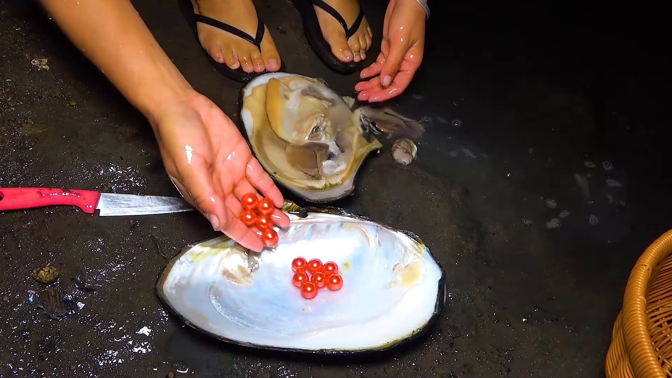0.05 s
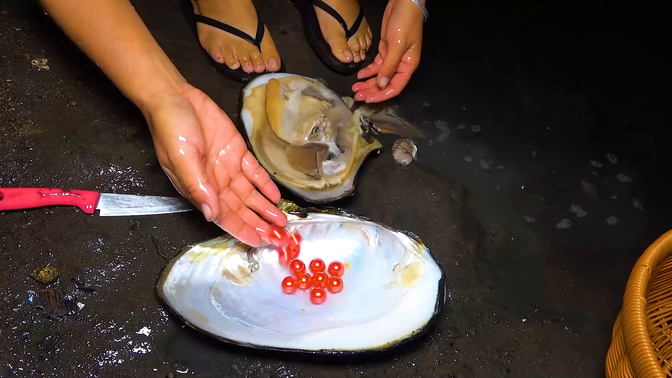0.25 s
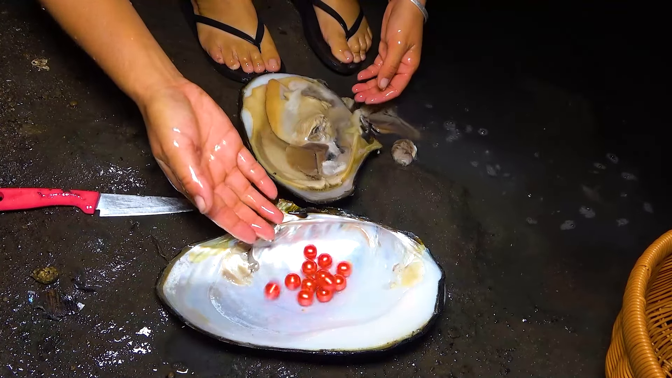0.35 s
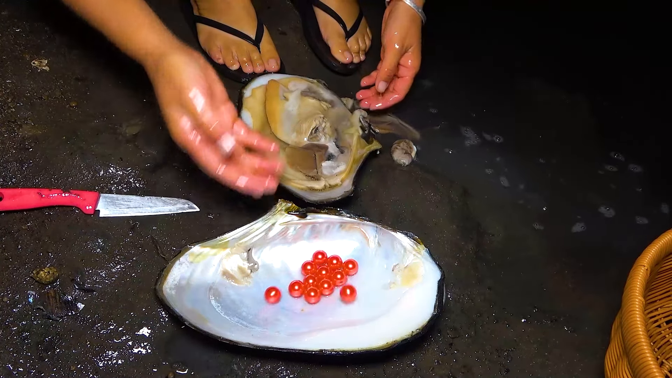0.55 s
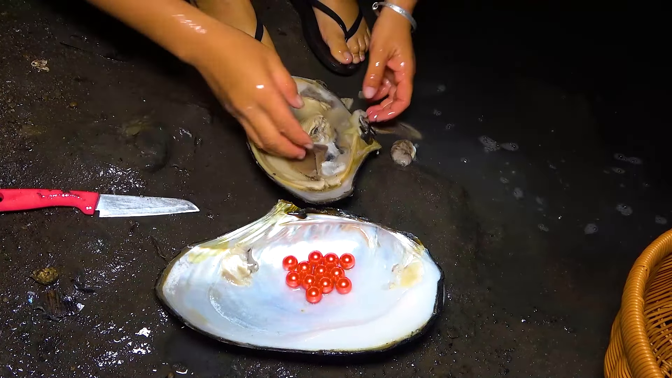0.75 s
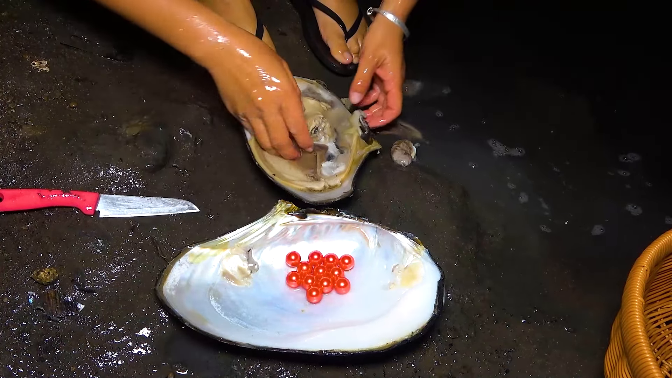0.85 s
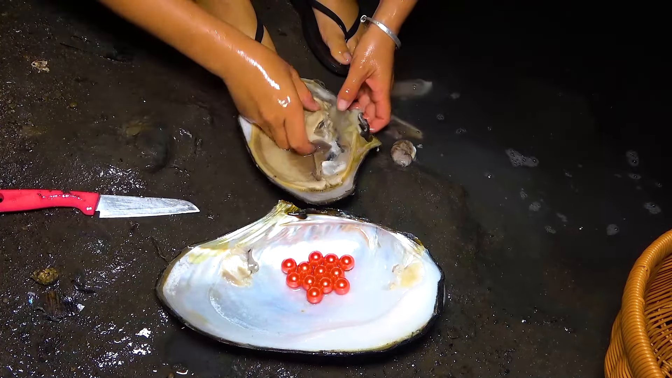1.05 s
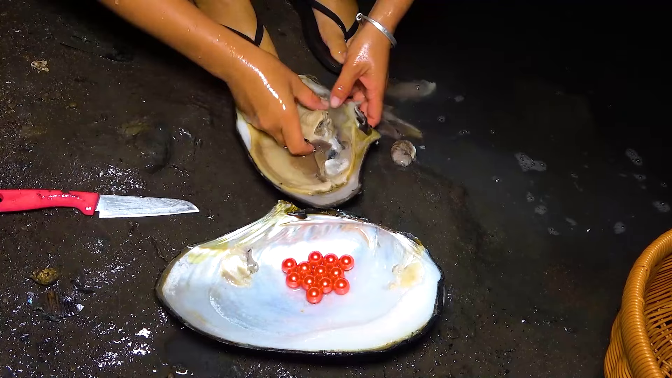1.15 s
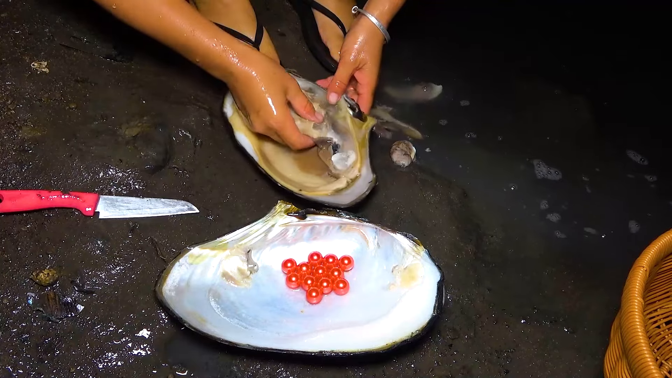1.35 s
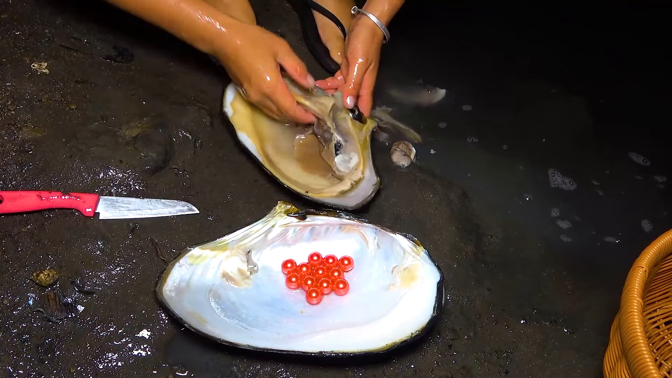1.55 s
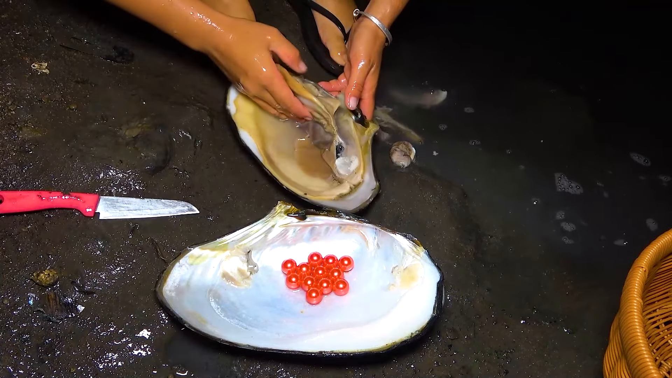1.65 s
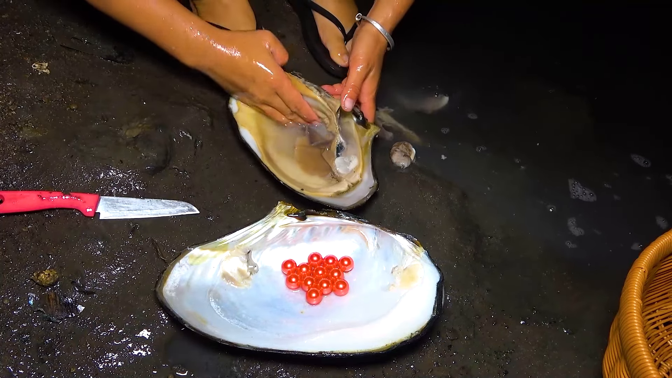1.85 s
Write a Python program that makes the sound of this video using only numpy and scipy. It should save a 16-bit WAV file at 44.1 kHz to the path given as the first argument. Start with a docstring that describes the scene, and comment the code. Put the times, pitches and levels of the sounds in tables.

```python
"""On wet ground between hard walls, close to an open shell, a handful of pearls is tipped in.
Each pearl is a crack, decaying sines for the shell's modes and a noisy rattle; tiny sines jostle among them.
A low thump lies under some clicks. Damped tones mixed with noise make wet ticks and a drip before and after,
over a trickle of filtered noise. The walls answer with a bright tail of about a second, made of noise
whose frequencies die at their own speeds. The camera's limiter ducks just ahead of the loudest clicks."""
import sys
import numpy as np
from scipy import signal
from scipy.fft import rfft, irfft, next_fast_len
from scipy.io import wavfile
from scipy.ndimage import uniform_filter1d, minimum_filter1d, map_coordinates

SR = 44100
rng = np.random.default_rng(int(sys.argv[2]) if len(sys.argv) > 2 else 0)


def generate_wav(sig):
    """Save sig (samples, or channels by samples) to the path in sys.argv[1] as 16-bit PCM at SR."""
    pcm = np.round(np.clip(np.atleast_2d(sig).T, -1, 1) * 32767).astype(np.int16)
    wavfile.write(sys.argv[1], SR, pcm)


N = 83790  # samples, 1.9 s


def amp(db):
    """Decibels to an amplitude factor."""
    return 10 ** (np.asarray(db) / 20)


def unit(x):
    """Scale to an rms of 1."""
    return x / np.sqrt(np.mean(x ** 2) + 1e-20)


def along(points, hz):
    """Read (pitch, value) points on a log frequency axis."""
    f, v = np.transpose(points)
    return np.interp(np.log(hz + 1), np.log(f + 1), v)


def over_time(points):
    """Read (time, dB) points at every sample, as an amplitude."""
    return amp(np.interp(np.arange(N) / SR, *np.transpose(points)))


def filtered(x, response):
    """Multiply the spectrum of x by a response of frequency."""
    n = x.shape[-1]
    m = next_fast_len(n + 8192)
    return irfft(rfft(x, m) * response(np.fft.rfftfreq(m, 1 / SR)), m)[..., :n]


def band(x, kind, hz):
    """A causal third-order roll-off, "low" or "high" pass."""
    sos = signal.butter(3, min(hz, SR / 2.1), kind, fs=SR, output="sos")
    return signal.sosfilt(sos, x)


def coloured(points, count):
    """Noise of rms 1 with a (Hz, dB) spectrum."""
    return unit(filtered(rng.standard_normal(count), lambda hz: amp(along(points, hz))))


def wobble(rate):
    """A smooth random curve, rate knots a second."""
    return map_coordinates(rng.standard_normal(int(N * rate / SR) + 4), [np.arange(N) * rate / SR])


def add(track, s, sound):
    """Mix a sound in at time s."""
    part = track[round(s * SR):][:len(sound)]
    part += sound[:len(part)]


# Spectrum of the trickling water: pitch_hz, relative_level_db (per Hz)
WATER_SPECTRUM = [(15, -30), (25, -7), (175, -4), (270, -7.5), (531, -1.5), (962, 1.5), (1160, -0.5),
                  (1480, -10.5), (3080, -10.5), (4610, -17.5), (6210, -11.5), (16000, -21.5)]
# How strongly the water flows: time_s, level_db
WATER_FLOW = [(0, -65.5), (.22, -61.5), (1.1, -61.5), (1.45, -62.5), (1.65, -65), (1.9, -63.5)]
# How strongly the restless band sounds: time_s, level_db
GURGLE_FLOW = [(0, -71.5), (.09, -59.5), (.22, -107), (1.2, -77.5), (1.6, -87.5), (1.9, -85)]
# Stereo width of the water: pitch_hz, side_gain_db
WATER_WIDTH = [(60, -7.5), (500, -7), (1300, -11), (1900, -15), (4300, -28), (5500, -6), (15000, -7.5)]
GURGLE_HZ, GURGLE_WIDTH_HZ = 1130, 200  # centre and half-width


def trickle():
    """Water as faint patchy noise plus a narrow noise band that flickers quickly; mid and side."""
    patchy = coloured(WATER_SPECTRUM, N) * amp(wobble(6.7))
    bed = np.array([patchy, coloured(WATER_SPECTRUM, N)])
    gurgle_band = lambda f: 1 / (1 + ((f - GURGLE_HZ) / GURGLE_WIDTH_HZ) ** 4)
    gurgle = unit(filtered(rng.standard_normal((2, N)), gurgle_band))
    gurgle = gurgle * amp(2.5 * wobble(40))
    mid, side = over_time(WATER_FLOW) * bed + over_time(GURGLE_FLOW) * gurgle
    return mid, filtered(side, lambda hz: amp(along(WATER_WIDTH, hz)))


# Small wet ticks and drips, not in time order:
# start_s, level_db (before the attack and preamp), pitch_hz, t60_s, noisy_share (0-1)
WET_TICKS = [(.0095, -21.5, 5090, 0.0096, 0.69), (.068, -47.5, 2380, 0.042, 0.36),
             (.0795, -33, 1158, 0.041, 0.04), (.0835, -45, 9160, 0.019, 0.02),
             (.211, -36, 4900, 0.0067, 0.84), (.236, -32.5, 4110, .05, .4), (.242, -27, 3220, 0.018, .4),
             (1.0782, -20.5, 3634, 0.032, 0.59), (1.081, -40.5, 596, 0.045, 0.8),
             (1.081, -37, 970, 0.086, 0.78), (1.189, -37.5, 6095, 0.014, 0.77),
             (1.207, -40.5, 2836, 0.048, .25), (1.222, -40.5, 1110, 0.019, 0.3),
             (1.328, -42.5, 1310, 0.026, 0.33), (1.328, -41, 9300, .012, .95),
             (1.403, -49, 770, 0.014, 0.45), (1.565, -46, 3640, .015, 0.55),
             (1.663, -51.5, 2340, 0.027, 0.3), (1.664, -50, 3270, 0.023, .1), (1.684, -52, 7320, 0.012, .3),
             (1.701, -44.5, 3300, 0.024, 0.73), (1.824, -43, 3530, 0.041, 0.56),
             (1.829, -44.5, 4860, 0.018, 0.9), (1.830, -49, 907, 0.017, .8), (1.190, -40, 1500, .01, .9),
             (1.029, -47, 3290, 0.019, 0.6), (1.041, -43, 1185, 0.029, 0.3),
             (1.272, -51, 1022, 0.032, 0.37), (1.459, -46.5, 3496, 0.02, 0.6),
             (1.594, -51, 1100, 0.012, 0.64), (1.802, -50, 3340, .015, .4)]
TICK_ATTACK_S, TICK_OCTAVES = 0.00069, 1.04  # noisier ticks are wider


def ticks():
    """Each tick or drip is a damped tone mixed with noise around the same pitch."""
    out, t = np.zeros(N), np.arange(SR // 12) / SR
    for s, db, hz, t60, noisy in WET_TICKS:
        share = np.clip(noisy, 0, 1)
        octaves = TICK_OCTAVES * max(share, .2)
        around = lambda f: np.exp(-(np.log2((f + 1) / hz) / octaves) ** 2)
        hiss = unit(filtered(rng.standard_normal(len(t)), around))
        body = (1 - share) * np.sin(2 * np.pi * hz * t) + share * hiss / 2
        envelope = amp(db - 60 * t / t60) * (1 - np.exp(-t / TICK_ATTACK_S))
        add(out, s, envelope * body)
    return out


# How long the walls ring: pitch_hz, t60_s
WALL_DECAY = [(300, 0.2), (1000, 1.69), (2500, 1.36), (4500, 1.193), (8000, 0.94), (13000, 0.33)]
# Tone of the wall tail at its start: pitch_hz, relative_level_db
WALL_TONE = [(200, -38), (600, -0.5), (1200, 6.5), (4000, 6.5), (8000, 11), (15000, -2)]
WALLS_DB, WALL_DELAY_S, WALL_RISE_S = -11.5, .006, 0.004


def walls(x):
    """Hard walls as convolution with noise, each frequency dying at its own speed; mid and side."""
    hz, t, z = signal.stft(rng.standard_normal((2, 2 * SR)), SR, nperseg=256)
    decay_db = along(WALL_TONE, hz)[:, None] - 60 * t / along(WALL_DECAY, hz)[:, None]
    shape = amp(decay_db) * (1 - np.exp(-t / WALL_RISE_S))
    tail = signal.istft(z * shape, SR, nperseg=256)[1]
    tail = tail / np.linalg.norm(tail[0])
    late = np.pad(x, (round(WALL_DELAY_S * SR), 0))[None]
    return amp(WALLS_DB) * signal.fftconvolve(late, tail, axes=1)[:, :N]


# Pearls landing, levels before filters and preamp:
# start_s, level_db, struck_mode_hz, thump_db, crack_db, low_mode_lift_db
LANDINGS = [(0.2477, -2, 7030, -25, 1, 9), (0.3001, -7, 4310, -74, -38, 20),
            (0.3064, -14.5, 4240, -29, -11, 19), (0.3263, -11, 2720, -63, -21.5, 10),
            (0.35, -11, 4260, -58, -13, -34), (.3739, -7, 2810, -33, -8.5, 3),
            (0.395, -12.5, 4210, -66, -34, -8), (0.4001, -6, 4150, -21.5, -23, 7),
            (0.4169, -16, 4180, -62, -12.5, 16), (0.4202, -7, 4200, -15, -9.5, 10),
            (0.43, -13, 4060, -50, -12, 9), (.4561, -4, 4800, -42, -18, -6),
            (0.4646, -9.5, 4340, -54, -17, -15), (0.4785, -10, 4250, -45, -38, -10),
            (.5012, -7.5, 3880, -60, -23, -5), (0.512, -20, 4100, -66, -25, 2),
            (.5217, -10.5, 4255, -71, -27.5, -21), (0.5584, -8.5, 3970, -65, -32, -17),
            (0.575, -25, 4347, -62.5, -31, -7), (0.6259, -7, 3870, -52, -5, -14),
            (0.653, -38.5, 3630, -74, -29, -9), (0.7091, -9.5, 4030, -44.5, -15, -4),
            (0.7572, -17, 3890, -65, -45, 14), (.786, -24, 4430, -77, -37, 21),
            (0.8313, -24.5, 4310, -65, -30, -9)]
# Modes of the shell: pitch_hz, relative_level_db, t60_s
SHELL_MODES = [(1192, -13, 0.045), (1915, -3.5, 0.018), (2822, 6.5, 0.041), (3097, 3, 0.075),
               (3360, -37, 0.025), (3882, 12.5, 0.022), (4274, 13, 0.018), (4895, 5, 0.025),
               (4780, -20, 0.033), (6050, 4, 0.075), (6380, -27, .02), (7270, 15.5, 0.012),
               (8000, -31, .015), (10780, 4, .012)]
# Spectrum of the rattle: pitch_hz, relative_level_db
RATTLE_SPECTRUM = [(400, -68), (800, -27), (1200, -0.5), (1600, -17.5), (2300, -10), (2800, -3), (4300, 7),
                   (7400, -4), (10000, -13), (15500, -33.5)]
# Modes near the struck one are lifted; every mode level scatters; modes below LOW_MODES_HZ share one lift
FAVOUR_DB, FAVOUR_OCTAVES, SCATTER_DB, LOW_MODES_HZ = 12, .08, 4, 2200
DETUNE = .005  # share of pitch; random detuning of each mode at every hit
CRACK_S, CRACK_LOW_HZ = 0.0029, 2500  # t60, high-pass
RATTLE_S, RATTLE_DB, RATTLE_SEND_DB = 0.019, -11, 8.5  # t60, level by the ring, extra send to the walls
THUMP_S, THUMP_LOW_HZ = 0.00042, 85  # time to peak, high-pass
CLICK_LOW_HZ, CLICK_HIGH_HZ, AIR_HZ = 847, 9730, 11150  # one high-pass, two low-passes


def pearls():
    """Each impact cracks, rings the shell's modes and rattles; clicks, rattles for the walls, low thumps."""
    clicks, thumps, sent = np.zeros((3, N))
    t = np.arange(SR // 10) / SR
    hz, level, t60 = np.transpose(SHELL_MODES)
    for s, db, struck, thump_db, crack_db, low_db in LANDINGS:
        lift = FAVOUR_DB * np.exp(-(np.log2(hz / struck) / FAVOUR_OCTAVES) ** 2)
        lift += SCATTER_DB * rng.standard_normal(len(hz))
        lift += low_db * (hz < LOW_MODES_HZ)
        pitch = hz * (1 + DETUNE * rng.standard_normal(len(hz)))
        decay = amp((level + lift)[:, None] - 60 * t / t60[:, None])
        ring = (decay * np.sin(2 * np.pi * pitch[:, None] * t)).sum(0)
        ring = ring / np.abs(ring).max()
        rattle = amp(RATTLE_DB - 60 * t / RATTLE_S) * coloured(RATTLE_SPECTRUM, len(t))
        crack_noise = band(rng.standard_normal(len(t)), "high", CRACK_LOW_HZ)
        crack = amp(crack_db - 60 * t / CRACK_S) * crack_noise
        add(clicks, s, amp(db) * (ring + rattle) + crack)
        add(sent, s, amp(db + RATTLE_SEND_DB) * rattle)
        add(thumps, s, amp(thump_db) * np.e * t / THUMP_S * np.exp(-t / THUMP_S))
    clicks = band(clicks, "high", CLICK_LOW_HZ)
    clicks = band(band(clicks, "low", CLICK_HIGH_HZ), "low", AIR_HZ)
    thumps = filtered(thumps, lambda f: (1j * f / (THUMP_LOW_HZ + 1j * f)) ** 2)
    return clicks, sent, thumps


# Base level of pearls clicking together: time_s, level_db (before random lift and preamp)
JOSTLE_LEVEL = [(.26, -36), (.4, -24), (.6, -24), (.8, -30), (.95, -42)]
JOSTLES, JOSTLE_HZ, JOSTLE_OCTAVES = 110, 4400, .3  # count, middle pitch, pitch spread
JOSTLE_CYCLES, JOSTLE_SPREAD_DB, JOSTLE_ATTACK_S = 9, 4.5, .0002  # cycles to fall 60 dB, mean lift, attack


def jostle(count):
    """Pearls rolling against each other: tiny damped sines at random times, sizes and pitches."""
    out, t = np.zeros(N), np.arange(SR // 100) / SR
    s, db = np.transpose(JOSTLE_LEVEL)
    times = rng.uniform(s[0], s[-1], count)
    sizes = rng.exponential(size=count)
    pitches = rng.standard_normal(count)
    for when, size, pitch in zip(times, sizes, pitches):
        hz = min(JOSTLE_HZ * 2 ** (JOSTLE_OCTAVES * pitch), SR / 4)
        level = np.interp(when, s, db) + JOSTLE_SPREAD_DB * size
        envelope = amp(level - 60 * t * hz / JOSTLE_CYCLES) * (1 - np.exp(-t / JOSTLE_ATTACK_S))
        add(out, when, envelope * np.sin(2 * np.pi * hz * t))
    return out


# Stereo width of the clicks, ticks and wall tail: pitch_hz, side_gain_db
SHELL_WIDTH = [(60, -9.5), (400, -7), (1200, -20), (2200, -38.5), (3500, -24.5), (5500, -10.5),
               (8000, -7.5), (14000, -10.5)]
TICK_SEND_DB, RING_SEND_DB = 0, -3  # what reaches the walls
LEFT_DB, RIGHT_DB = 0.27, 0.66  # the shell leans left, the trickle right


def scene():
    """Pearls, jostling, ticks and their wall tail lean left; the trickle leans right."""
    clicks, rattles, thumps = pearls()
    clicks = clicks + jostle(count=JOSTLES)
    small = ticks()
    near = clicks + small
    wet = walls(amp(RING_SEND_DB) * clicks + rattles + amp(TICK_SEND_DB) * small)
    water_mid, water_side = trickle()
    mid = near + thumps + wet[0]
    near_side = .7 * np.pad(near, (9, 0))[:N]  # nine samples late
    side = filtered(wet[1] + near_side, lambda hz: amp(along(SHELL_WIDTH, hz)))
    shell = np.array([mid + side, mid - side]) * amp([[LEFT_DB], [-LEFT_DB]])
    water = np.array([water_mid + water_side, water_mid - water_side])
    return shell + water * amp([[-RIGHT_DB], [RIGHT_DB]])


PREAMP_DB, THRESHOLD_DB, AHEAD_S, RELEASE_S = 6, -6.5, 0.0016, 0.014
FIRMNESS = .8  # share of the overshoot (in dB) that the limiter takes away
TOP_HZ = 15750


def record(dry):
    """The camera's preamp, a look-ahead limiter shared by both channels, then the band limit."""
    ahead, release = max(round(AHEAD_S * SR), 1), max(round(RELEASE_S * SR), 1)
    dry = dry * amp(PREAMP_DB)
    peak = np.abs(dry).max(0) + 1e-9
    need = np.minimum(1, amp(THRESHOLD_DB) / peak) ** FIRMNESS
    held = minimum_filter1d(need, 2 * ahead + 1)
    fall = np.exp(-1 / release)
    slow = 1 - signal.lfilter([1 - fall], [1, -fall], 1 - held)
    gain = uniform_filter1d(np.minimum(held, slow), ahead)
    return filtered(dry * gain, lambda hz: hz < TOP_HZ)


dry = scene()
out = record(dry)
generate_wav(out)
```